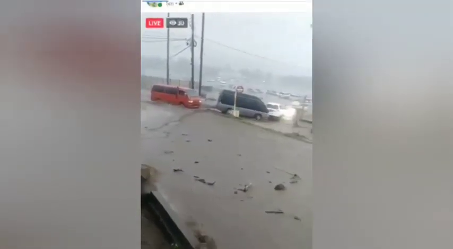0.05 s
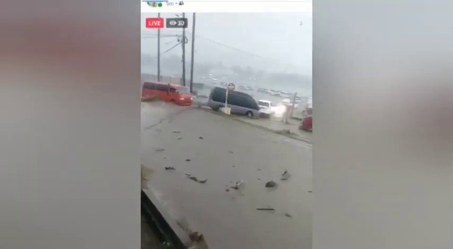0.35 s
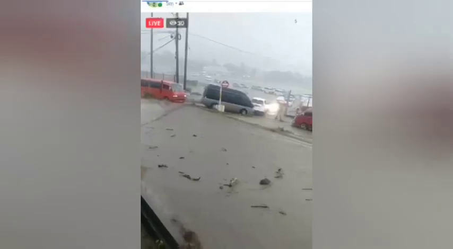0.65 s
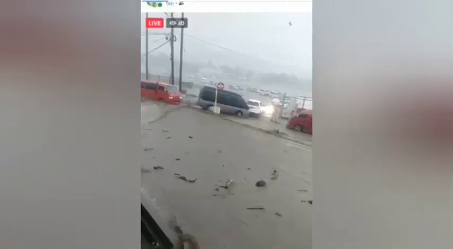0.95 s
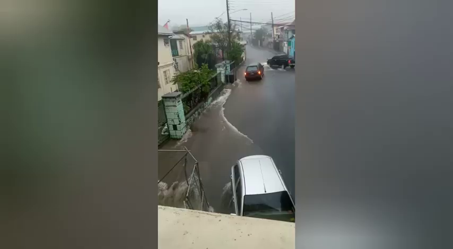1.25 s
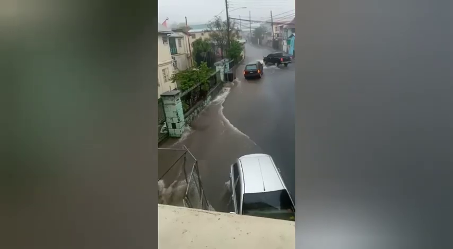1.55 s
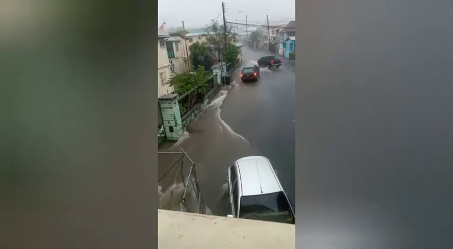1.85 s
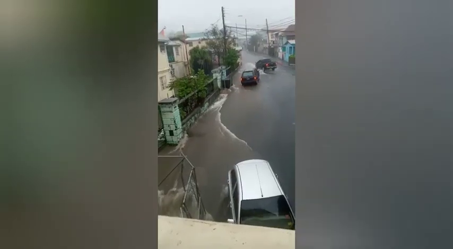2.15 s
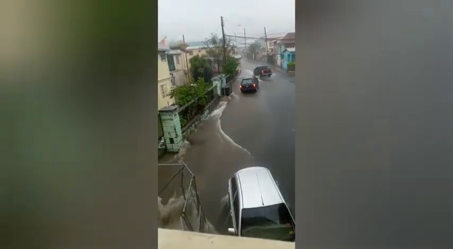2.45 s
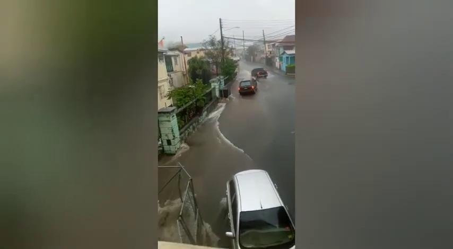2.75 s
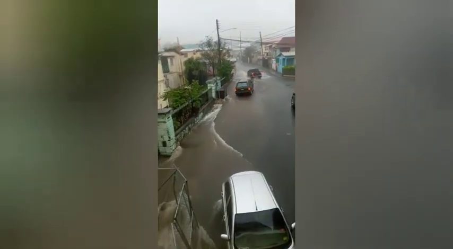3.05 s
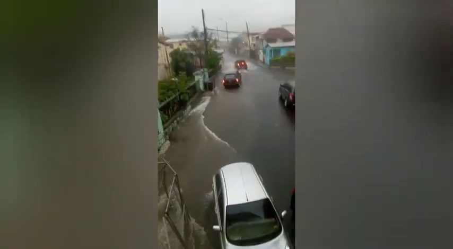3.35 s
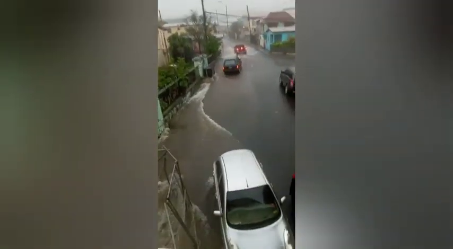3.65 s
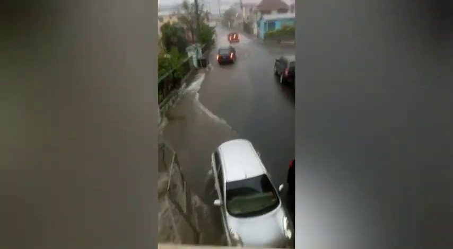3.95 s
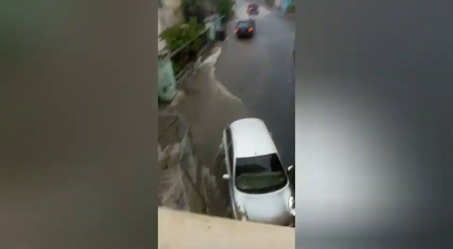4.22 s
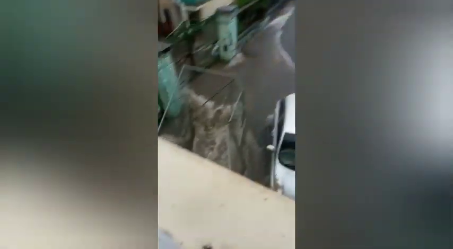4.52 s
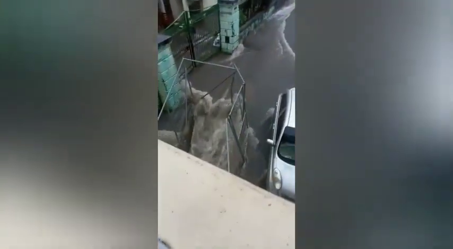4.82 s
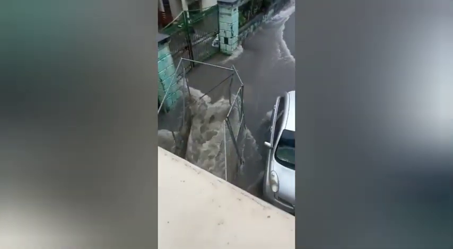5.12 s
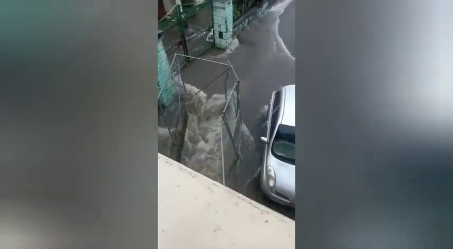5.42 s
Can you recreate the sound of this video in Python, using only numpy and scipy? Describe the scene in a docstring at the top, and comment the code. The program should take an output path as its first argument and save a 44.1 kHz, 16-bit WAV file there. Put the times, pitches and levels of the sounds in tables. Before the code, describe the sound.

Hissing rain with hollow drips stops dead; after a short silence, floodwater fades in, rushing and gurgling along a street.

```python
"""Downpour, then a flooded street

In mono, rain hisses, fat drips knock on a hollow cover close by and the phone takes a few soft bumps.
It all stops dead. After a short silence, floodwater fades in, in stereo, rushing along a street below
a balcony: turbulence, ringing bubbles and spray. The phone turns down to where it gushes through a gate."""
import sys
import numpy as np
from scipy import signal
from scipy.fft import rfft, irfft
from scipy.io import wavfile
from scipy.ndimage import uniform_filter1d

SR = 44100
rng = np.random.default_rng(int(sys.argv[2]) if len(sys.argv) > 2 else 0)


def persist_wave(psi):
    """Save psi, clipped to +-1, as 16-bit WAV."""
    counts = np.round(np.clip(psi, -1, 1) * 32767).astype(np.int16)
    wavfile.write(sys.argv[1], SR, np.atleast_2d(counts).T)


N = 246078
TIME = np.arange(N) / SR
HZ = np.fft.rfftfreq(N, 1 / SR)

# The flood's tone at each microphone port. Each row: frequency in Hz, relative level in dB.
LEFT_EQ = [(25, -46), (55, -20.5), (140, -4), (430, 0.5), (800, -2.5), (2100, -3), (3100, -3.5),
           (4700, -11.5), (6400, -9.5), (8500, -16.5), (11000, -24.5), (14000, -29), (14800, -24),
           (15700, -24)]
RIGHT_EQ = [(25, -46), (55, -19.5), (160, -5.5), (500, -5), (1050, -8), (2000, -13), (4200, -14),
            (6500, -14.5), (8200, -23), (10600, -12), (12400, -22), (14000, -25), (14800, -14),
            (15700, -17.5)]
# How alike the ports sound, close only in the lows. Each row: frequency in Hz, likeness from 0 to 1.
PORT_LIKENESS = [(40, 1), (200, 0.8), (450, 0.53), (560, 0.4), (700, 0.16), (2000, 0.03), (5000, 0.03)]
# The water's colour. Each row: centre in Hz, width in Hz, gain in dB for the street, then for the gate.
WATER_BANDS = [(96, 51, 3.5, 0), (270, 82, 2, 0.1), (457, 170, 1, -1), (1057, 310, -0.2, 2),
               (1820, 590, 2.5, 0.5), (6400, 710, 1, 1)]
# Gushes that swell and fall back. Each row: crest time in seconds, lift in dB, centre in Hz.
WATER_SURGES = [(2.77, 1, 700), (4.73, 0.9, 1100)]
# The downpour's tone. Each row: frequency in Hz, relative level in dB.
RAIN_EQ = [(20, -26), (55, -5.5), (130, -4), (300, -5), (460, -2.5), (720, -7.5), (1050, -7), (1450, -6),
           (2400, -9), (4000, -9), (6800, -8.5), (9300, -19), (10200, -28.5), (11300, -32)]
# Fat drips. Each row: start in seconds, peak in dB, lift of the upper modes in dB, ring time factor.
FAT_DRIPS = [(.075, -23.5, 29, 1), (.249, -23.5, -7, 0.96), (.275, -21.5, -7, .8), (.413, -22, 1, 0.73),
             (.461, -23, 2, 1), (.502, -21, 13, .7), (.552, -24, 15, 0.87), (.792, -18.5, 6.5, 1.5),
             (.853, -16.5, 0, 1), (1.023, -14, -1, 0.38), (1.131, -15, -4, 0.57), (1.142, -15.5, -1.5, .4),
             (1.173, -16.5, -2, 0.46)]
# The hollow cover's modes. Each row: base pitch in Hz, relative level in dB, base t60 in seconds.
COVER_MODES = [(471, -0.5, 0.055), (375, -13, .035), (590, -10, 0.036), (1397, -13.5, 0.073),
               (1850, -19, 0.028)]
# Soft bumps on the phone. Each row: start in seconds, level in dB, pitch in Hz.
PHONE_BUMPS = [(.161, -34, 180), (.428, -26, 100), (0.56, -29, 95), (.930, -19.5, 105), (0.986, -19.5, 90),
               (1.189, -21.5, 150)]

CUT_S, FADE_FROM_S, FADE_TO_S = 1.243, 1.599, 1.893  # the rain stops; the flood fades in


def flood(lag_ms=1.107, spray_hz=6000, rush_db=-19.5, spray_db=-21, spray_db_per_s=0.78):
    """Water reaches the right port first; its spray hisses more as the phone leans out over it."""
    shared, separate = rfft(churn()), rfft(churn())
    likeness = np.clip(curve(PORT_LIKENESS), 0, 1)
    delay = np.exp(-2j * np.pi * HZ * lag_ms / 1000)
    left = (likeness * shared * delay + np.sqrt(1 - likeness ** 2) * separate) * amp(curve(LEFT_EQ))
    right = shared * amp(curve(RIGHT_EQ))
    ports = np.array([amp(4.5) * unit(irfft(left, N)), amp(0.07) * unit(irfft(right, N))])
    spray = irfft(rfft(ports) * HZ ** 4 / (HZ ** 4 + spray_hz ** 4), N)
    rush_gain = amp(rush_db - 0.3 * phone_turn() + swell_db())
    spray_gain = amp(spray_db + spray_db_per_s * (TIME - FADE_TO_S) + swell_db())
    return (ports - spray) * rush_gain + spray * spray_gain


def churn():
    """Turbulent water: a dense rush, gurgling bubbles and raindrops landing on it."""
    rush = wash(patchy_db=1.19, flicker_db=0.37, patch_hz=400, patch_s=0.041)
    bubbles = grains(179.9, 2600, per_s=500, cycles=43.4, spread_db=1.7, glide=0.022, count=48)
    drops = grains(1500, 14300, per_s=5000, cycles=3, spread_db=1.6, glide=.02)
    return rush + amp(-13.5) * bubbles + amp(-14.5) * drops


def surges(ports, width_s=0.16):
    """Each surge of water lifts a broad band of the rush for a moment."""
    for s, db, hz in WATER_SURGES:
        lift = amp(db * bell(TIME, s, width_s))
        ports = ports + band_around(ports, hz, octaves=1.9) * (lift - 1)
    return ports


def street_to_gate(ports, gate_before=0.21):
    """As the phone turns, the street's deep roar and bright splash give way to the gate's hollow gush."""
    gate_share = gate_before + (1 - gate_before) * phone_turn()
    spectrum = rfft(ports)
    for hz, width, street_db, gate_db in WATER_BANDS:
        band = irfft(spectrum * bell(HZ, hz, width) ** 2, N)
        ports = ports + band * (amp(street_db + gate_share * (gate_db - street_db)) - 1)
    return ports


def phone_turn(midpoint_s=4.34, length_s=0.41):
    """How far the phone has turned, from the street (0) to the gate (1)."""
    return np.clip((TIME - midpoint_s) / length_s + .5, 0, 1)


def downpour(level_db=-26, wind_db_per_s=2, gust_db=3.5, gust_s=1.22):
    """Far rain and the ticks of nearer drops; the splashing grows with the wind and ends on a gust."""
    drops = wash(patchy_db=1.7, flicker_db=0.54, patch_hz=450, patch_s=0.05)
    drops += amp(-11.5) * grains(900, 9000, per_s=1500, cycles=2.6, spread_db=2.0, glide=.02)
    rain = unit(irfft(rfft(drops) * amp(curve(RAIN_EQ)), N))
    splash = band_around(rain, hz=1200, octaves=1.02)
    splash_db = -1.7 + wind_db_per_s * np.minimum(TIME, CUT_S) + gust_db * bell(TIME, gust_s, 0.062)
    return amp(level_db) * (rain + splash * (amp(splash_db) - 1))


def drips(small_per_s=14, pitch_scatter=.16, spots=10):
    """Fat drips knock on the cover amid a light patter and small drips, pitched by where they land."""
    fat, small = np.zeros(N), np.zeros(N)
    for s, db, lift_db, length in FAT_DRIPS:
        pitch = length ** -.09  # a knock that dies sooner sounds a little higher
        add(fat, s, amp(db) * cover_ring(pitch, lift_db, length))
    for pitch in 1 + pitch_scatter * np.linspace(-1, 1, spots):
        hits = impacts(small_per_s / spots, spread_db=1.5)
        small += signal.oaconvolve(hits, cover_ring(pitch, lift_db=0, length=0.74))[:N]
    patter = grains(1250, 1900, per_s=100, cycles=29, spread_db=2, glide=.005)
    return fat + amp(-47) * unit(small) + amp(-45.5) * patter


def cover_ring(pitch, lift_db, length, attack_s=.002):
    """The cover's modes after one soft, wet blow; a drip near the rim rings the upper ones more."""
    t = TIME[:6000]
    ring = np.zeros(len(t))
    for hz, db, t60 in COVER_MODES:
        envelope = amp(db + lift_db * (hz > 1000) - 60 * t / (t60 * length))
        ring += envelope * np.sin(2 * np.pi * hz * pitch * t)
    ring *= 1 - np.exp(-t / attack_s)
    return ring / abs(ring).max()


def bumps(cycles=1.3, snap=0.21, rub_db=-14, rub_hz=500):
    """Each bump is one steep push and pull on the microphone, with a dull rub."""
    out = np.zeros(N)
    muffle = signal.butter(2, rub_hz, fs=SR, output="sos")
    for s, db, hz in PHONE_BUMPS:
        phase = 2 * np.pi * np.arange(-cycles / 2, cycles / 2, hz / SR)
        rub = unit(signal.sosfilt(muffle, rng.standard_normal(len(phase))))
        push = -np.sin(phase) - snap * np.sin(2 * phase)
        envelope = np.cos(phase / (2 * cycles)) ** 2
        add(out, s, amp(db) * (push + amp(rub_db) * rub) * envelope)
    return out


def grains(low_hz, high_hz, per_s, cycles, spread_db, glide, count=32):
    """Drops and bubbles: each rings for some cycles and rises in pitch as it nears the surface."""
    out = np.zeros(N)
    for hz in np.geomspace(low_hz, high_hz, count):
        age = TIME[:4000] * hz / cycles
        ring = np.exp(-np.pi * age) * np.sin(2 * np.pi * cycles * age * (1 + glide * age))
        out += hz * signal.oaconvolve(impacts(per_s / count, spread_db), ring)[:N]
    return unit(out)


def impacts(per_s, spread_db):
    """Random hits, mostly small and a few large."""
    size = amp(spread_db * np.minimum(rng.exponential(1, N), 4))
    return size * rng.choice([-1, 1], N) * (rng.random(N) < per_s / SR)


def wash(patchy_db, flicker_db, patch_hz, patch_s):
    """A bed of countless far drops: noise that swells in short patches of pitch and flickers as a whole."""
    hz, t, spectra = signal.stft(rng.standard_normal(N), SR, nperseg=512, noverlap=384)
    patches = uniform_filter1d(rng.standard_normal(spectra.shape), max(round(patch_hz / hz[1]), 1), axis=0)
    patches = unit(uniform_filter1d(patches, max(round(patch_s / t[1]), 1), axis=1))
    flicker = unit(uniform_filter1d(rng.standard_normal(len(t)), size=8))
    spectra *= amp(patchy_db * patches + flicker_db * flicker)
    return unit(signal.istft(spectra, SR, nperseg=512, noverlap=384)[1][:N])


def swell_db(depth_db=0.2, drift_s=0.17):
    """A slow, random drift in level."""
    slow_band = bell(HZ * drift_s, 0, 1) * (HZ > 0)
    return depth_db * unit(irfft(rfft(rng.standard_normal(N)) * slow_band, N))


def amp(db):
    """Decibels to gain."""
    return 10 ** (np.asarray(db) / 20)


def unit(x):
    """Scales to rms 1."""
    return x / np.sqrt(np.mean(x ** 2) + 1e-20)


def curve(points):
    """Joins points across the spectrum on a log-frequency axis."""
    hz, value = np.transpose(points)
    return np.interp(np.log(HZ + 1), np.log(hz + 1), value)


def bell(x, centre, width):
    """A bell curve of height 1."""
    return np.exp(-((x - centre) / width) ** 2)


def band_around(x, hz, octaves):
    """The broad band of a sound around one pitch."""
    return irfft(rfft(x) * bell(np.log2((HZ + 1) / hz), 0, octaves), N)


def add(mix, s, sound):
    """Mixes a sound in at s seconds."""
    part = mix[max(round(s * SR), 0):][:len(sound)]
    part += sound[:len(part)]


def lowpass(x, hz):
    """A steep high cut."""
    return signal.fftconvolve(x, signal.firwin(1023, hz, window=("kaiser", 9), fs=SR)[None], "same")


def scene(fade_start_db=-26, stop_s=0.0022):
    """The downpour stops dead; after the silence the flooded street fades in."""
    rain = lowpass((downpour() + drips() + bumps())[None], hz=11500)
    water = street_to_gate(surges(flood()))
    cut = np.exp(-np.clip((TIME - CUT_S) / stop_s, 0, 30))
    rise = np.clip((TIME - FADE_FROM_S) / (FADE_TO_S - FADE_FROM_S), 0, 1) ** 1.04
    fade_in = (TIME > FADE_FROM_S) * (rise + amp(fade_start_db) * (1 - rise))
    return rain * cut + water * fade_in


def record(dry):
    """The phone loses the very top end."""
    return lowpass(dry, hz=15830)


dry = scene()
out = record(dry)
persist_wave(out)
```